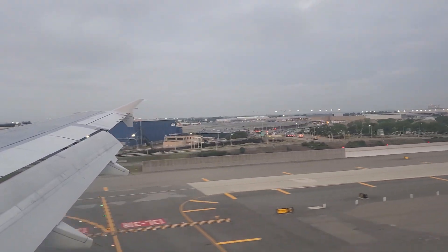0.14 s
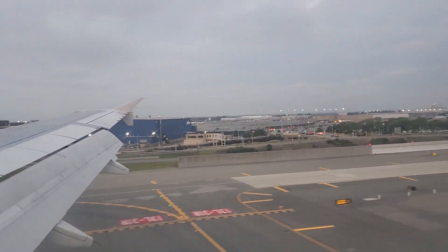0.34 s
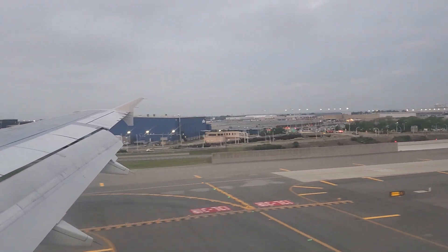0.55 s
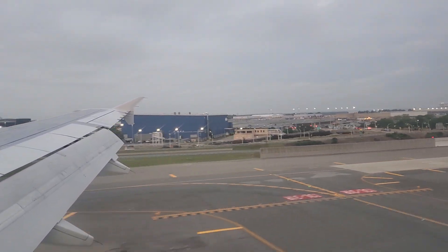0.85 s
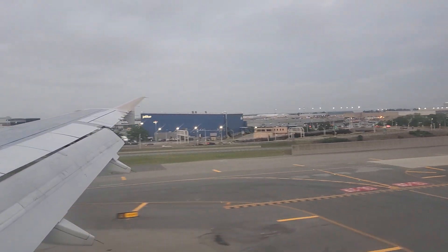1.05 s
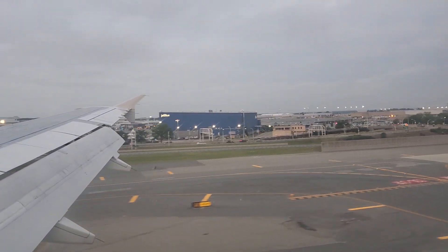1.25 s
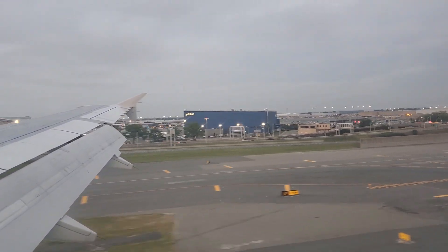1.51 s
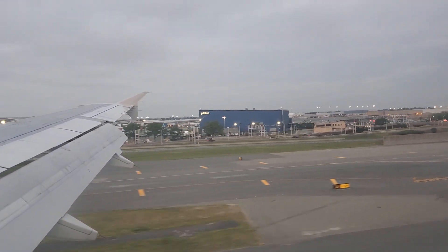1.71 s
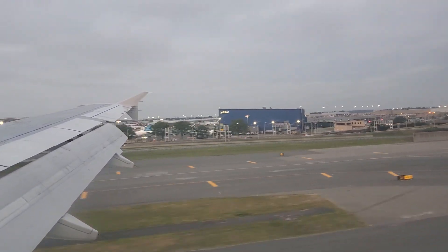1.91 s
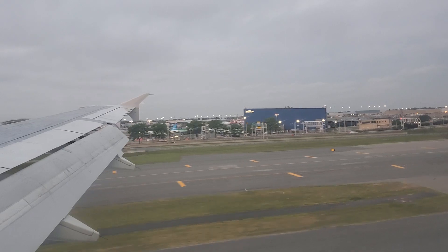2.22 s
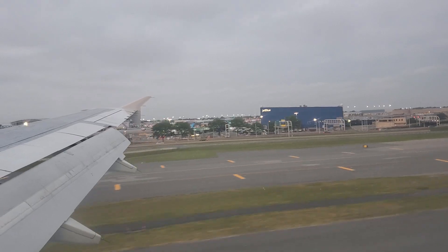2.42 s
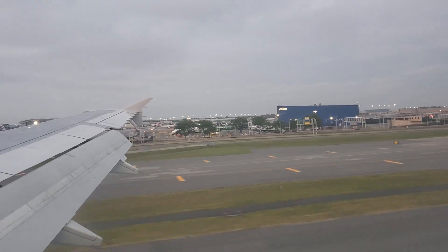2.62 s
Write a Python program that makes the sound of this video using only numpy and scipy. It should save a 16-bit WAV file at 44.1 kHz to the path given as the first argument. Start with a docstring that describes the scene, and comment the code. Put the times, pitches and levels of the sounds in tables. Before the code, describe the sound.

An airliner rolls along the ground with a deep, uneven rumble and dull engine roar, heard from a window seat. A faint hum and air hiss continue underneath. A small tick comes first, then a latch snaps shut once.

```python
"""Inside an airliner rolling along the ground. The wheels shake the fuselage into a deep, uneven rumble,
engine and rolling noise roar dully through the cabin wall, and the vents hiss.
The engine fan hums and creeps up in pitch. Loose fittings tick faintly, and a hard latch snaps shut
once, rebounds and rings; seats and panels reflect the ticks and the snap."""
import sys
import numpy as np
from scipy import signal
from scipy.fft import rfft, irfft, next_fast_len
from scipy.io import wavfile
from scipy.ndimage import uniform_filter1d, map_coordinates

SR = 44100
rng = np.random.default_rng(int(sys.argv[2]) if len(sys.argv) > 2 else 0)


def file_out(sig):
    """Save sig as 16-bit WAV at sys.argv[1]."""
    # one column per channel
    cols = np.atleast_2d(sig).T
    # limit, then scale
    lim = np.clip(cols, -1, 1)
    pcm = np.round(lim * 32767).astype(np.int16)
    wavfile.write(sys.argv[1], SR, pcm)


N = 121716


def amp(db):
    """Decibels to gain."""
    return 10 ** (np.asarray(db) / 20)


def unit_rms(x):
    """x at rms 1."""
    return x / np.sqrt(np.mean(x ** 2) + 1e-20)


def at_hz(points, hz):
    """Interpolate (Hz, value) points on a log frequency axis."""
    knots_hz, values = np.transpose(points)
    return np.interp(np.log(hz + 1), np.log(knots_hz + 1), values)


def curves(rows):
    """One value per sample for each column after the time."""
    times_s, *columns = np.transpose(rows)
    return [np.interp(np.arange(N) / SR, times_s, column) for column in columns]


def wobble(rate_hz):
    """Smooth random curve, rate_hz knots a second."""
    knots = rng.standard_normal(int(N * rate_hz / SR) + 4)
    return map_coordinates(knots, [np.arange(N) * rate_hz / SR])


def noise(spectrum):
    """Noise of rms 1, shaped by (Hz, dB) points."""
    size = next_fast_len(N + SR // 4)
    gain = amp(at_hz(spectrum, np.fft.rfftfreq(size, 1 / SR)))
    return unit_rms(irfft(rfft(rng.standard_normal(size)) * gain, size)[:N])


def resonate(x, gain_of_hz, size=4096):
    """x through a minimum-phase filter of the given shape, scaled to energy 1."""
    gain = gain_of_hz(np.fft.rfftfreq(size, 1 / SR))
    cepstrum = irfft(np.log(np.maximum(gain, 1e-6)))
    cepstrum[1:size // 2] *= 2
    cepstrum[size // 2 + 1:] = 0
    response = irfft(np.exp(rfft(cepstrum)))
    return signal.fftconvolve(x, response / np.linalg.norm(response))[:len(x)]


def band(x, centre_hz, octaves):
    """x through one resonant band."""
    return resonate(x, lambda hz: (1 + (np.log2((hz + 1) / centre_hz) / octaves) ** 2 / 4) ** -3)


def fade(t, t60_s):
    """Gain of a decay that loses 60 dB in t60_s."""
    return np.exp(-np.log(1000) * t / t60_s)


def add(track, start_s, sound):
    """Mix a sound into the track."""
    part = track[round(start_s * SR):][:len(sound)]
    part += sound[:len(part)]


# Each row: time in seconds, rumble level in dB.
RUMBLE_LEVELS = [(0.02, -14.5), (0.34, -22.5), (0.41, -13.5), (0.8, -19.5), (0.81, -17), (0.97, -13),
                 (1.06, -25.5), (1.09, -10), (1.11, -21.5), (1.36, -17), (1.38, -23.5), (1.48, -13),
                 (1.54, -25.5), (1.57, -15.5), (2.03, -18), (2.09, -11.5), (2.22, -19), (2.73, -14.5)]
# Each row: frequency in Hz, relative density in dB.
RUMBLE_SPECTRUM = [(12, -62), (24, -35), (33, -10.5), (46, -2), (58, 1), (74, 1.5), (98, 1), (116, -10.5),
                   (150, -28), (300, -103.5)]

def wheels(evenness=.6, window_s=.055):
    """Deep rumble of the fuselage, swelling with the bumps in the pavement."""
    level_db, = curves(RUMBLE_LEVELS)
    shake = noise(RUMBLE_SPECTRUM)
    power = np.abs(signal.hilbert(shake)) ** 2
    swell = np.abs(uniform_filter1d(power, int(window_s * SR))) + 1e-6
    steadied = shake / swell ** (evenness / 2)  # partly flattens chance swells
    return amp(level_db) * unit_rms(steadied)


# Each row: time in seconds, relative roar level in dB.
ROAR_LEVELS = [ [(0.02, -26), (0.03, -24), (1.34, -23.5), (1.36, -21), (1.4, -24), (2.71, -23),
               (2.73, -24.5)], ][0]
# Each row: frequency in Hz, relative density in dB.
ROAR_SPECTRUM = [(70, -32), (115, -4.5), (145, 1), (175, -3), (220, -2), (260, -6), (320, -7.5), (365, -16),
                 (395, -13), (425, -17.5), (520, -22), (630, -30), (770, -32), (860, -39), (1000, -42),
                 (1400, -58), (2500, -88.5)]

def roar(gain_db=.5):
    """Engine and rolling noise, dulled by the cabin wall."""
    level_db, = curves(ROAR_LEVELS)
    return amp(level_db + gain_db + .36 * wobble(10)) * noise(ROAR_SPECTRUM)


# Each row: frequency in Hz, relative density in dB.
VENT_SPECTRUM = [(500, -14.5), (1100, 1.5), (1500, -2.5), (1770, -5), (2000, -3), (2300, -11.5),
                 (2900, -12), (3700, -23), (4400, -26), (5600, -41.5), (15000, -47.5)]

def vents(level_db=-64.5):
    """Faint steady air hiss."""
    return amp(level_db + .3 * wobble(4.4)) * noise(VENT_SPECTRUM)


# Each row: time in seconds, fan pitch in Hz, hum level in dB, whine level in dB.
FAN_TONE = [(0, 476, -43, -75), (.35, 473.5, -47.5, -74), (.85, 475.6, -47, -69), (1.22, 475.6, -45, -69),
            (1.5, 479, -51.5, -77), (1.78, 483, -40, -70), (2.08, 479.2, -52, -67), (2.33, 483.8, -50, -81),
            (2.76, 486.6, -50, -78.5)]
# Each row: harmonic number, level in dB relative to the whine.
FAN_HARMONICS = [(3, -1), (4, -12.5), (5, -17)]

def engine_fan():
    """The fan's hum and the thin whine of its overtones; each wavers in level on its own."""
    pitch_hz, hum_db, whine_db = curves(FAN_TONE)
    phase = 2 * np.pi * np.cumsum(pitch_hz + .8 * wobble(25)) / SR
    whine = sum(amp(whine_db + db + 1.6 * wobble(16)) * np.sin(k * phase) for k, db in FAN_HARMONICS)
    hum = amp(hum_db + .8 * wobble(9)) * np.sin(phase)
    return np.sqrt(2) * (hum + whine)


# Each row: frequency in Hz, cabin T60 in seconds.
CABIN_DECAY = [(900, 0.14), (2400, 0.13), (4500, 0.16), (7000, 0.14), (14000, 0.09)]

def cabin_tail(t, late_db=-31.5, late_cutoff_hz=4500, rise_s=.002):
    """Dense reflections from seats and panels, then a faint dull tail from down the aisle."""
    hz, frames_s, bins = signal.stft(rng.standard_normal(len(t)), SR, nperseg=256)
    bins *= fade(frames_s, at_hz(CABIN_DECAY, hz)[:, None])
    early = signal.istft(bins, SR, nperseg=256)[1][:len(t)]
    lowpass = signal.butter(2, late_cutoff_hz, fs=SR, output='sos')
    late = amp(late_db) * fade(t, t60_s=.6) * signal.sosfilt(lowpass, rng.standard_normal(len(t)))
    return (early + late) * (1 - np.exp(-t / rise_s))


# Each row: start in seconds, knock level in dB, centre in Hz, width in octaves,
# click level in dB relative to the knock, ring pitch in Hz, ring level in dB.
FITTING_TICKS = [(0.132, -69.5, 3000, 0.43, -1, 2910, -79.5), (.348, -50.5, 1860, 0.53, -24, 3570, -75.5),
                 (.462, -70.5, 3310, 0.46, -15, 2870, -74.5), (1.792, -78, 4550, 0.24, 1, 4350, -88.5),
                 (2.203, -83, 8260, 0.22, -2.5, 8030, -97.5), (2.236, -81.5, 10370, 0.11, 0, 3188, -75),
                 (2.668, -73.5, 4500, .22, 2, 4300, -81.5), (2.72, -84, 9000, .5, -2, 4350, -90)]

def fittings(cabin_db=-4):
    """Loose fittings tick: a knock, a bright click and a faint after-ring."""
    out, t = np.zeros(N), np.arange(SR // 2) / SR
    for start_s, knock_db, centre_hz, octaves, click_db, ring_hz, ring_db in FITTING_TICKS:
        click = fade(t, t60_s=.051) * rng.standard_normal(len(t)) + amp(cabin_db) * cabin_tail(t)
        knock = band(click, centre_hz, octaves)
        ring = band(fade(t, t60_s=.49) * rng.standard_normal(len(t)), ring_hz, octaves=.09)
        add(out, start_s, amp(knock_db) * (knock + amp(click_db) * click) + amp(ring_db) * ring)
    return out


# Each row: contact delay in seconds, relative level in dB.
LATCH_CONTACTS = [(0, -2), (0.0142, -13), (.025, -21.5)]
# Each row: frequency in Hz, relative gain of the latch body in dB.
LATCH_BODY = [(500, -25), (830, -19.5), (960, 7), (1230, -0.5), (1380, -6), (1700, 3), (2200, -3.5),
              (2800, -4.5), (3400, -10), (4400, -13), (6300, -24), (8500, -22.5), (12000, -29),
              (15500, -36)]
# Each row: mode frequency in Hz, relative level in dB, T60 in seconds.
LATCH_RING = [(969, -30.5, 0.15), (1150, 8.5, 0.02), (1170, -20, .08), (1630, -10.5, .075),
              (1704, 5, 0.023), (2045, -18, .086), (2595, -18.5, .11), (2780, -12, 0.0087),
              (2800, -35, 0.13), (2905, -20, .15), (3335, -26.5, 0.2), (4490, -20, .09),
              (5400, -24.5, 0.124)]

def latch(start_s=.9002, gain_db=-25.5, rise_s=.0025, cabin_db=-4.5):
    """A sharp snap with two rebounds, a short ring and cabin reflections."""
    out, t = np.zeros(N), np.arange(SR // 2) / SR
    attack = np.minimum(t / rise_s, 1)
    envelope = attack * fade(np.maximum(t - rise_s, 0), t60_s=.011)
    drive = amp(cabin_db) * cabin_tail(t)
    for delay_s, db in LATCH_CONTACTS:
        add(drive, delay_s, amp(db) * envelope * rng.standard_normal(len(t)))
    snap = resonate(drive, lambda hz: amp(at_hz(LATCH_BODY, hz)))
    ring = sum(amp(db) * fade(t, t60_s) * np.sin(2 * np.pi * hz * t) for hz, db, t60_s in LATCH_RING)
    add(out, start_s, amp(gain_db) * (snap + ring * attack ** 2))
    return out


def scene():
    """Everything heard at a window seat, in mono."""
    return (wheels() + roar() + vents() + engine_fan() + latch() + fittings())[None]


def record(dry):
    """A steep low-pass removes the highest treble."""
    cutoff_hz = 15720
    return signal.sosfilt(signal.ellip(10, .1, 80, cutoff_hz, fs=SR, output='sos'), dry)


dry = scene()
out = record(dry)
file_out(out)
```